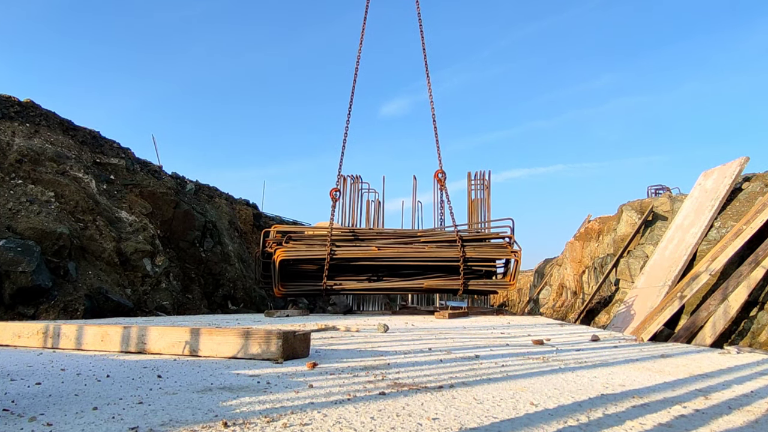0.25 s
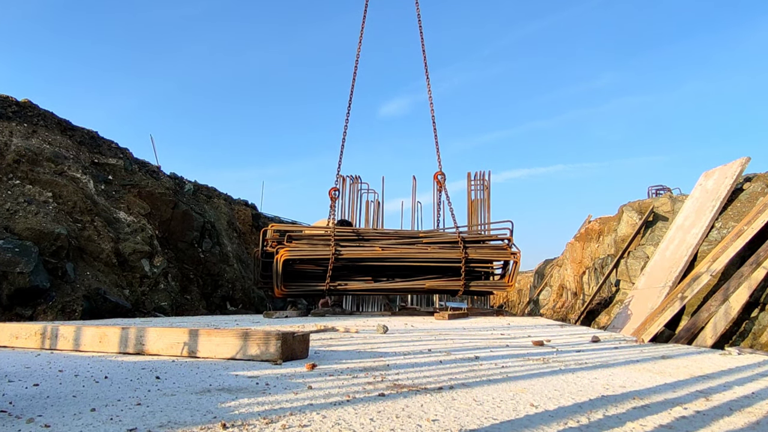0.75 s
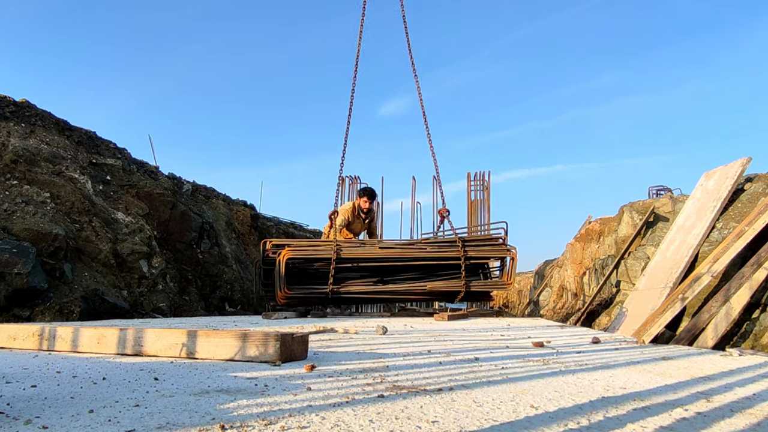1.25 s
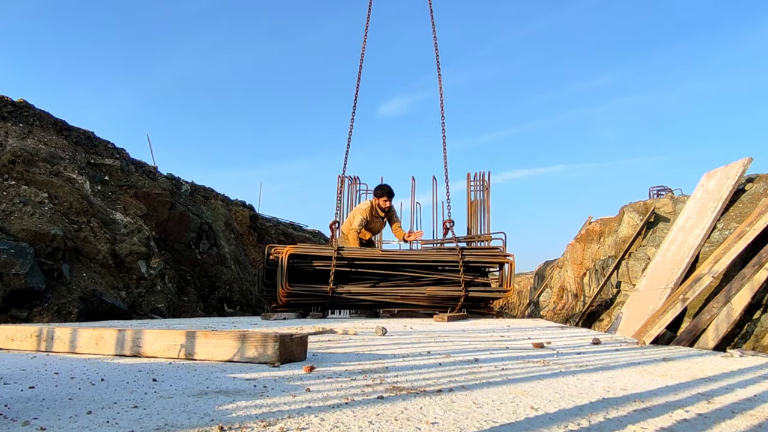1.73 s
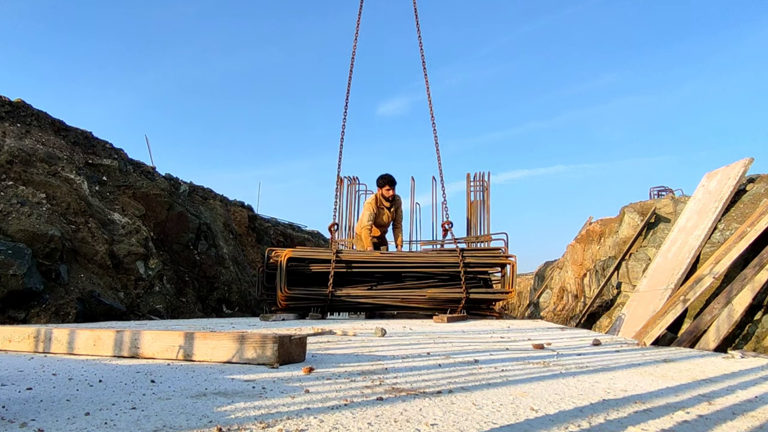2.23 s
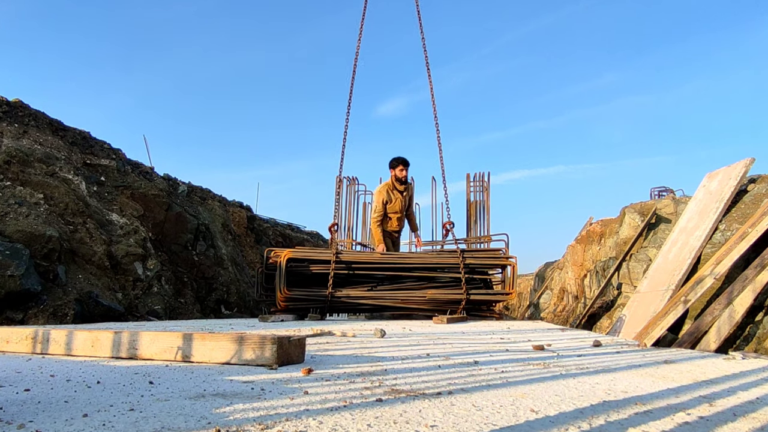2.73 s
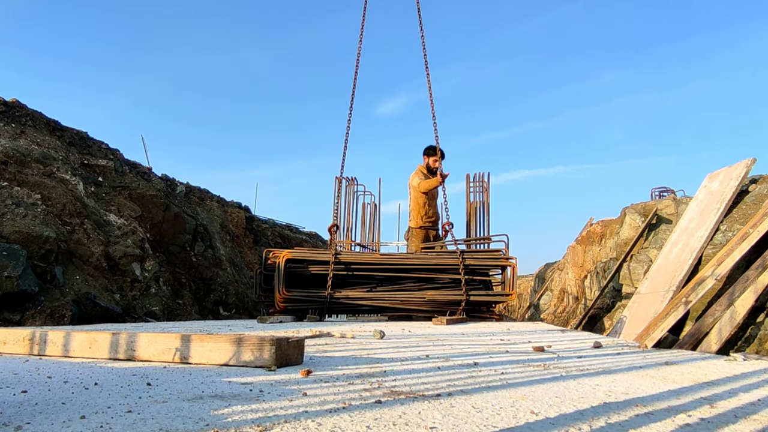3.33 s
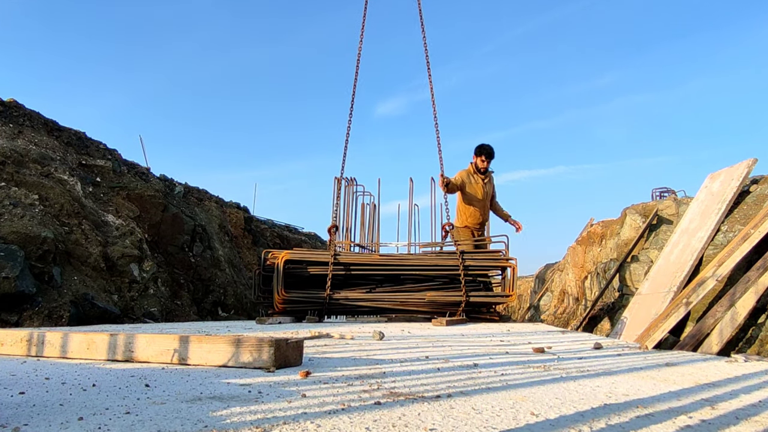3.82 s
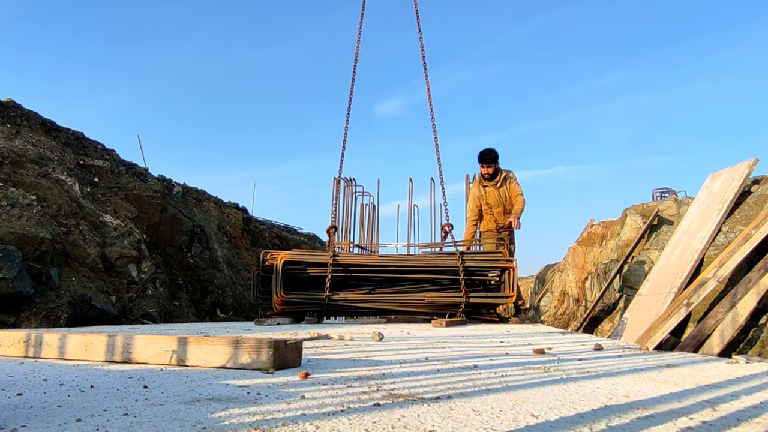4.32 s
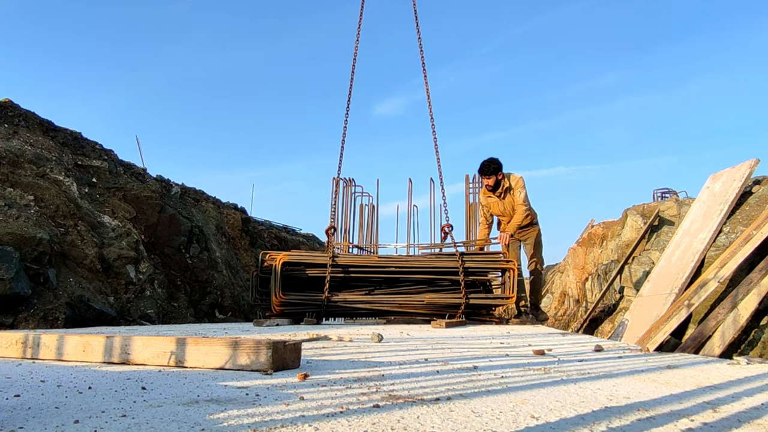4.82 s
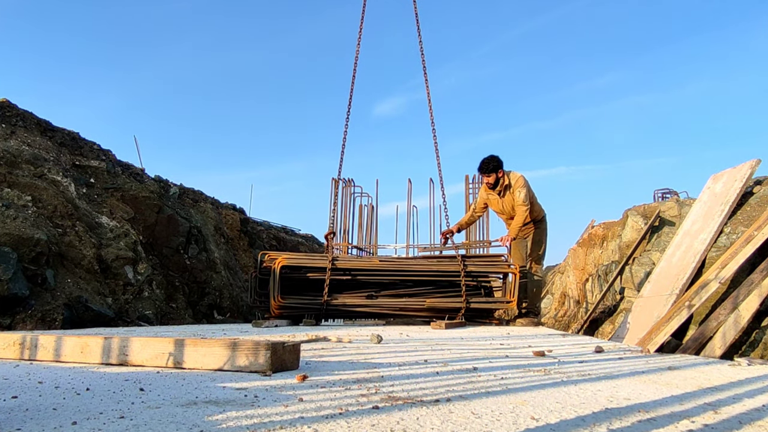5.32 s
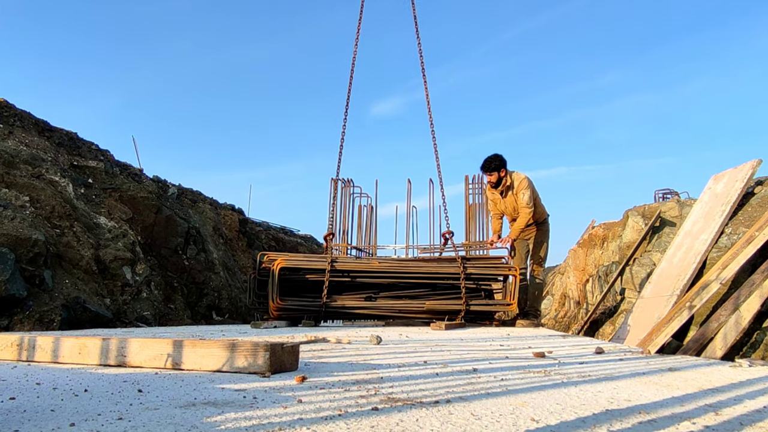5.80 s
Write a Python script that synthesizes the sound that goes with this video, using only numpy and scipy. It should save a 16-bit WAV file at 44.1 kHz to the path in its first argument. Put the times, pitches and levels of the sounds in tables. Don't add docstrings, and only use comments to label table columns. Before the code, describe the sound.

Close metallic clatter of rebar landing on a slab, sparse clinks afterwards, with idling machinery, distant hammering and a late engine rev.

```python
import sys
import numpy as np
from scipy import signal
from scipy.io import wavfile

SR = 44100
rng = np.random.default_rng(int(sys.argv[2]) if len(sys.argv) > 2 else 0)


def output_pcm(signal):
    pcm = np.clip(np.atleast_2d(signal).T, -1, 1) * 32767
    wavfile.write(sys.argv[1], SR, np.round(pcm).astype(np.int16))


def how_loud(loudness_db):
    steps = np.asarray(loudness_db, float) / 20
    return 10 ** steps


N = 266937
T = np.arange(N) / SR

# (frequency [Hz], density [dB per Hz])
SITE_SPECTRUM = [(12, -37), (20, -9), (47, -2), (87, -14.5), (160, -14), (224, -17.5), (400, -22),
                 (896, -23.5), (1200, -26.5), (2180, -36.5), (3130, -42), (5000, -69.5), (8500, -60),
                 (14000, -59.5)]
# (frequency [Hz], shared power [0-1])
SIDE_LIKENESS = [(60, 1), (300, 1), (1000, 0.83), (2500, 0.42), (4000, 0.12), (14000, 0.05)]
# (time [s], opening [0-1])
THROTTLE = [
    (4.7, 0),
    (5.15, 1),
    (5.55, 1),
    (5.8, 0.14),
]
# (firing rate [Hz], [(multiple [-], rms level [dB])])
STEADY_MACHINES = [
    (38.7, [(1, -55.5), (2, -40), (3, -54.5), (4, -44.5), (5, -46.5)]),
    (41.2, [(1, -55), (2, -45.5), (3, -46), (4, -50.5)]),
    (47.7, [(1, -38)]),
]
# (time
# [s], # firing rate [Hz], load [dB])
CRANE_REVS = [(0, 50.66, -32.5), (.7, 44, -44), (.95, 44.4, -31), (1.7, 53.53, -62), (2.4, 47, -37),
              (2.65, 52.1, -43), (4.5, 51.2, -41), (4.9, 40.49, -38), (5.13, 44.16, -38),
              (5.41, 51.15, -31.5), (5.54, 50.9, -36), (5.68, 51.7, -76), (6.05, 47.9, -40)]
# (time [s], level [dB])
JINGLE = [(0.0, -57.5), (0.17, -65), (1.09, -62.5), (1.25, -44), (2.08, -31), (2.19, -63), (2.75, -52),
          (3.3, -66.5), (4.6, -65.5), (5.34, -62), (5.55, -40), (5.86, -61), (6.05, -58)]
# (time [s], level [dB])
SLIDING = [
    (1.07, -64.5),
    (1.112, -16.5),
    (1.2, -25.5),
    (1.31, -21),
    (1.6, -18.5),
    (1.765, -21.5),
    (1.79, -30),
    (1.875, -24.5),
    (1.99, -40.5),
]
# (frequency [Hz], density [dB per Hz])
BAR_SPECTRUM = [(120, -33), (200, 9), (272, -25), (405, -0.5), (593, -11.5), (724, -3.5), (1250, -12.5),
                (2000, -3.5), (7230, -3), (9490, -7.5), (13400, -5), (14400, -29), (15200, -57.5)]
# (time [s], peak [dB], favoured pitch [Hz], clatter t60 [s])
SWINGING = [(0.0568, -38.5, 7840, 0.046), (0.1171, -39, 8250, 0.061), (0.4269, -40, 2980, 0.12),
            (0.9487, -37, 3400, 0.07)]
# (time [s], peak [dB], favoured pitch [Hz], clatter t60 [s])
LANDING = [(1.0872, -27.5, 3320, 0.23), (1.1047, -8.5, 6500, 0.17), (1.1119, -7, 7450, 0.11),
           (1.2148, -31.5, 5300, 0.066), (1.247, -13, 5310, 0.23), (1.295, -5.5, 7700, 0.23),
           (1.3853, -7.5, 6610, 0.34), (1.476, -32.5, 5790, 0.14), (1.495, -9.5, 7490, 0.23),
           (1.5254, -4, 7150, 0.38), (1.6209, -3.5, 6950, 0.23), (1.6736, -2, 7420, 0.11)]
# (time [s], peak [dB], favoured pitch [Hz], clatter t60 [s])
BOUNCING = [(1.836, -18.5, 4900, 0.12), (1.8845, -4.5, 8000, 0.12), (2.0001, -6.5, 6650, 0.19),
            (2.065, -18, 6400, 0.5)]
# (time [s], peak [dB], favoured pitch [Hz], clatter t60 [s])
SETTLING = [(2.168, -29, 4840, 0.18), (2.185, -37, 8700, 0.18), (2.2147, -25.5, 3050, 0.16),
            (2.286, -28, 7200, 0.17), (2.308, -23.5, 6100, 0.081), (2.3291, -21.5, 8400, 0.23),
            (2.4917, -46, 3270, 0.14), (2.5127, -32, 5890, 0.21), (2.5343, -32.5, 5770, 0.38),
            (2.579, -33, 8650, 0.25), (2.6035, -29, 3460, 0.25), (2.7147, -52.5, 3620, 0.11),
            (2.8295, -24.5, 5600, 0.17), (2.8794, -26, 3700, 0.23), (2.9612, -48, 5710, 0.067),
            (3.0505, -46, 3240, 0.11), (3.0744, -38, 3910, 0.14), (3.0909, -38, 4930, 0.21),
            (3.1445, -35, 8620, 0.28), (3.2141, -32, 6800, 0.3), (3.25, -30, 5600, 0.2),
            (3.3243, -33, 8600, 0.34)]
# (time [s], peak [dB], favoured pitch [Hz], clatter t60 [s])
UNHOOKING = [(3.4181, -42, 3250, 0.29), (3.459, -41, 7070, 0.27), (3.5354, -44.5, 3250, 0.17),
             (3.5818, -29.5, 6400, 0.28), (3.6098, -27.5, 6200, 0.11), (3.7783, -44, 5180, 0.2),
             (3.899, -45, 5670, 0.1), (3.9923, -37, 6740, 0.19), (4.0133, -35.5, 5710, 0.33),
             (4.0463, -32, 7560, 0.12), (4.1814, -37, 4290, 0.14), (4.5855, -47.5, 3440, 0.18),
             (4.6997, -57, 3300, 0.14), (4.8412, -34.5, 5140, 0.17)]
# (time [s], peak [dB], favoured pitch [Hz], clatter t60 [s])
HANDLING = [(5.3046, -53, 3180, 0.16), (5.3921, -40, 3210, 0.19), (5.425, -24, 2700, 0.083),
            (5.4715, -23.5, 7100, 0.49), (5.5144, -16.5, 6800, 0.17), (5.5638, -19, 4750, 0.11),
            (5.6445, -22.5, 6800, 0.2), (5.739, -32, 6950, 0.11), (5.8187, -24, 3550, 0.43),
            (6.016, -31, 7060, 0.19)]
# (time [s], peak [dB], favoured pitch [Hz], clatter t60 [s])
FURTHER_CONTACTS = [(0.4494, -39.5, 4570, 0.3), (0.489, -44, 3530, 0.33), (1.145, -6, 6210, 0.088),
                    (1.3394, -21, 6500, 0.13), (1.4204, -19, 5610, 0.09), (1.559, -14, 6800, 0.086),
                    (1.6396, -7, 7000, 0.051), (2.3594, -37, 8050, 0.24), (2.8994, -42, 3870, 0.1),
                    (3.1344, -36, 8520, 0.12), (3.3794, -34, 5670, 0.09), (3.6294, -35.5, 3130, 0.13),
                    (5.2694, -45, 6930, 0.29), (5.5252, -14.5, 7400, 0.073), (5.6, -27, 3200, 0.25),
                    (5.6694, -39, 7310, 0.072), (5.8504, -27.5, 7560, 0.097), (5.879, -25, 3870, 0.068)]
# (events, middle re peak [dB], top re peak [dB])
CONTACT_KINDS = [(SWINGING, 0.5, -15), (LANDING, -25.5, -16.5), (BOUNCING, -15.5, -14.5), (SETTLING, -14.5, -17),
                 (UNHOOKING, -12, -31), (HANDLING, -8.5, -38), (FURTHER_CONTACTS, -20.5, -14.5)]
# (time [s], peak [dB])
THUDS = [(1.117, -21), (1.15, -25), (1.336, -28), (1.395, -23), (1.428, -31.5), (1.619, -29.5),
         (1.678, -21), (1.883, -38)]
# (time [s], peak [dB], lower mode re peak [dB], left re right [dB])
CHAIN_CLINKS = [(0.116, -44.5, -20, 7), (2.1855, -29, -10, 6), (2.575, -41, -10, 9),
                (2.8285, -39.5, 5, 15.5), (2.8524, -43, -6, 12.5), (2.9594, -63, 18, 2),
                (3.091, -50, -10, 12), (3.1433, -49, -15, 19), (3.1554, -47, -6, 21), (3.252, -45, 1, 4),
                (3.325, -41.5, -2.5, 13), (3.4994, -59, -8, 12.5), (3.6105, -41.5, -8, 15),
                (4.841, -66, 19, 4)]
# (frequency [Hz], level [dB], t60 [s])
LINK_MODES = [
    (8620, 3.5, 0.055),
    (5610, 1, 0.073),
    (7330, -1.5, 0.038),
    (12800, -16, .06),
]
# (time [s], peak [dB], lower mode [dB], upper mode [Hz])
HAMMER_KNOCKS = [(0.9492, -32.5, -9, 2000), (2.4239, -43, 3, 1670), (3.023, -36.5, -2.5, 1560),
                 (3.631, -34, -2, 1480), (4.239, -33, -10, 1480), (4.8516, -33.5, -9, 1490)]
# (time [s], pressure [full scale], decay [s], swing [Hz])
DIAPHRAGM_JOLTS = [
    (1.084, -.07, .006, 3),
    (1.673, -.13, .03, 3),
    (1.686, -.3, .055, 5.5),
    (1.787, .27, .25, .9),
    (1.884, -.08, .1, .5),
]
# (time [s], level [dB])
GAIN_DUCK = [
    (1.69, 0.5),
    (1.72, -7),
    (1.76, -7.5),
    (1.8, 0.5),
    (1.9, 1),
]


def rms_one(x):
    return x / np.sqrt(np.mean(x ** 2) + 1e-20)


def in_time(rows):
    s, *columns = np.transpose(rows)
    return [np.interp(T, s, c) for c in columns]


def at_hz(points, hz):
    table_hz, values = np.array(points).T
    return np.interp(np.log(hz), np.log(table_hz), values)


def drift(rate_hz):
    r = np.exp(-80 * np.pi * rate_hz / SR)
    slow = signal.lfilter([1], [1, -2 * r, r * r], rng.standard_normal(N // 40 + 2002))[2000:]
    return np.interp(np.arange(N) / 40, np.arange(len(slow)), rms_one(slow))


def band_noise(x, low_hz, high_hz):
    return signal.sosfilt(signal.butter(2, [low_hz, high_hz], "band", fs=SR, output="sos"), x)


def dying(s, t60, rise_s):
    start = round(s * SR)
    t = np.arange(min(int(t60 * 1.2 * SR), N - start)) / SR
    return start, t, (1 - np.exp(-t / rise_s)) * how_loud(-60 * t / t60)


def puff(s, level_db, t60, low_hz, high_hz):
    out = np.zeros(N)
    i, t, shape = dying(s, t60, rise_s=0.0005)
    noise = band_noise(rng.standard_normal(len(t)), low_hz, high_hz)
    out[i:i + len(t)] = how_loud(level_db) * shape * rms_one(noise)
    return out


def roar(patchy_db):
    shared, own = 0, 0
    edges = 20 * 2 ** np.arange(0, 9.7, .45)
    white, together = rng.standard_normal((2, 3, N)), drift(0.83)
    for k, (low, high) in enumerate(zip(edges, edges[1:])):
        band = band_noise(white[k % 2], low, high)
        hz = np.sqrt(low * high)
        alike = np.clip(at_hz(SIDE_LIKENESS, hz), 0, 1)
        flicker_db = patchy_db * (.5 * together + drift(23))
        gain = how_loud(at_hz(SITE_SPECTRUM, hz) - 1.63 * (hz < 220) + flicker_db)
        shared = shared + gain * np.sqrt(alike) * band[0]
        own = own + gain * np.sqrt(1 - alike) * band[1:]
    middle = band_noise(shared + own[0], 250, 900)
    level_db = -44 + 3.0 * in_time(THROTTLE)[0]
    level = how_loud(level_db) / np.std(middle)
    return level * shared, level * own


def steady_machines():
    out = 0
    for hz, orders in STEADY_MACHINES:
        turn = 2 * np.pi * np.cumsum(hz * (1 + 0.00291 * drift(0.84))) / SR
        for multiple, level_db in orders:
            level = how_loud(level_db + 0.5 + 1.5 * drift(9.4))
            out = out + level * np.sin(multiple * turn + rng.uniform(0, 6.46))
    return out


def crane_engine():
    hz, load_db = in_time(CRANE_REVS)
    upper_db = -14.5 + 12 * in_time(THROTTLE)[0]
    turn = 2 * np.pi * np.cumsum(hz) / SR
    upper = np.cos(2 * turn) + how_loud(5.0) * np.cos(3 * turn) + how_loud(-17.5) * np.cos(4 * turn)
    rasp = band_noise(rng.standard_normal(N), 300, 1100)
    upper += how_loud(4.0) * rasp * (1 + np.cos(turn))
    return how_loud(load_db - 1.5) * (np.cos(turn) + how_loud(upper_db) * upper)


def grains(per_s, spread_db, shared):
    sizes = how_loud(spread_db * np.minimum(rng.exponential(1, (3, N)), 5)) * rng.choice([-1, 1], (3, N))
    both, *own = sizes * (rng.random((3, N)) < per_s / SR)
    return rms_one(np.sqrt(shared) * both + np.sqrt(1 - shared) * np.array(own))


def bar(low_hz, high_hz, cycles, favoured_hz=1, favour_db=0, count=36):
    t = np.arange(SR // 22, dtype=np.float32) / SR
    draw = rng.random((4, count, 1), dtype=np.float32)
    hz = low_hz * (high_hz / low_hz) ** ((np.arange(count)[:, None] + draw[0]) / count)
    favour = favour_db * np.exp(-(np.log(hz / favoured_hz) / 0.19) ** 2)
    gain = how_loud(at_hz(BAR_SPECTRUM, hz) + favour) * hz
    hz = hz.astype(np.float32)
    mode_cycles = cycles * how_loud(11.0 * (draw[1] - .5))
    fade = np.exp(-t * (np.log(1000) * hz / mode_cycles).astype(np.float32))
    side_shift = [[[0]], [[.6]]] * draw[3] * np.minimum(hz / 2500, 1)
    phase = 2 * np.pi * (draw[2] + side_shift)
    body = np.sum(gain * fade * np.sin(2 * np.pi * hz * t + phase.astype(np.float32)), axis=1)
    return body / np.sqrt(np.sum(body ** 2) / 2)


def shake(push, low_hz, high_hz, cycles, swap_db, count, favoured_hz=1, favour_db=0):
    out, dealt = 0, rng.integers(0, count, N)
    shares = how_loud(swap_db * np.array([drift(16.0) for k in range(count)]))
    shares /= np.sqrt(np.mean(shares ** 2, axis=0))
    for k in range(count):
        ring = bar(low_hz, high_hz, cycles, favoured_hz, favour_db)
        out = out + signal.oaconvolve(push * (dealt == k) * shares[k], ring, axes=1)[:, :N]
    return out


def blows(contacts, mid, top):
    out, snap = np.zeros((2, N)), np.zeros(N)
    lead = round(.001 * SR)
    events = [(*row, *colour) for rows, *colour in CONTACT_KINDS for row in rows]
    for s, peak_db, hz, t60, mid_db, top_db in events:
        octaves = np.log2(hz / 5500)
        i, t, shape = dying(s - .001, np.clip(t60, .02, .5), rise_s=0.0015)
        shape = how_loud(peak_db - 9.5) * shape * (1 + 0.53 * np.exp(-t / 0.0033))
        push = shape * contacts[:, i:i + len(t)]
        push[:, lead] += 10 * shape.max()
        contacts[:, i + lead] += 4
        rung = signal.oaconvolve(push, bar(2058, 9333, 140, hz, favour_db=5.5), axes=1)
        out[:, i:i + rung.shape[1]] += rung[:, :N - i]
        snap[i:i + len(t)] += shape.max() * how_loud(7.0 + 0.37 * top_db) * np.exp(-t / 0.0016)
        mid[i:i + len(t)] += how_loud(mid_db - 2 * octaves) * shape
        top[i:i + len(t)] += how_loud(top_db + 7 * octaves) * shape
    return out + band_noise(snap * rng.standard_normal((2, N)), 4000, 16000)


def thuds(contacts, slide):
    set_down_s = 1.7
    low = slide * how_loud(np.where(T < set_down_s, -16, -37) - 4.0)
    for s, peak_db in THUDS:
        i, t, shape = dying(s - .002, t60=0.21, rise_s=0.0051)
        low[i:i + len(t)] += how_loud(peak_db - 5.5) * shape
    both_sides = contacts + 0.75 * contacts[::-1]
    return shake(both_sides * low * 0.63, 220, 874, cycles=18, swap_db=6, count=2, favoured_hz=330, favour_db=11.0)


def slab():
    slam = puff(1.6845, -16, 0.013, 180, 1200) * [[1], [.6]]
    whip = np.stack([puff(1.8848, -10.5, .012, 4500, 15000) for side in range(2)])
    return slam + whip


def bundle():
    on = (T > SLIDING[0][0]) & (T < SLIDING[-1][0])
    slide = on * how_loud(in_time(SLIDING)[0] - 1.0)
    jingle = how_loud(np.minimum(in_time(JINGLE)[0], -44))
    bright, mid = np.hypot(slide, jingle), slide * how_loud(-11.5)
    top = np.hypot(slide * how_loud(-22.5), jingle * how_loud(-32.5))
    contacts = grains(per_s=2500, spread_db=3.0, shared=0.34)
    out = blows(contacts, mid, top)
    out += shake(contacts * bright, 2500, 9300, cycles=210, swap_db=11.5, count=5)
    out += shake(contacts * top, 9300, 14500, cycles=190, swap_db=21.5, count=2)
    out += shake(contacts * mid, 900, 2500, cycles=17.7, swap_db=6.0, count=4)
    out += thuds(contacts, slide) + slab()
    return out * how_loud([[.3], [-.3]])


def chain():
    out = np.zeros((2, N))
    for s, peak_db, lower_db, pan_db in CHAIN_CLINKS:
        pan = np.array([[pan_db / 2], [-pan_db / 2]])
        for k, (hz, level_db, t60) in enumerate(LINK_MODES):
            i, t, shape = dying(s, t60, rise_s=0.0003)
            level = how_loud(peak_db + level_db + lower_db * (k == 1) + pan)
            out[:, i:i + len(t)] += level * shape * np.sin(2 * np.pi * (hz * t + rng.random((2, 1))))
    return out


def hammer():
    out = np.zeros(N)
    for s, peak_db, low_db, hz in HAMMER_KNOCKS:
        i, t, shape = dying(s - .001, t60=0.02, rise_s=0.0017)
        both = np.sin(2 * np.pi * hz * t) + how_loud(low_db) * np.sin(2 * np.pi * 1050 * t)
        out[i:i + len(t)] += how_loud(peak_db + 7.5) * shape * both
        out += puff(s - .001, peak_db - 4.5, 0.017, 0.38 * hz, 1.3 * hz)
    out += how_loud(-4) * np.roll(out, round(0.0042 * SR))
    return out * how_loud([[1.2], [-1.2]])


def jolt():
    out = np.zeros(N)
    for s, size, decay_s, hz in DIAPHRAGM_JOLTS:
        t = np.maximum(T - s, 0)
        out += (1 - np.exp(-t / 0.0019)) * size * np.exp(-t / decay_s) * np.cos(2 * np.pi * hz * t)
    return out


def scene():
    shared, own = roar(patchy_db=1.5)
    machines = shared + steady_machines() + crane_engine()
    left_lead = 19
    machines = np.stack([machines, np.roll(machines, left_lead)]) + own
    return machines * how_loud([[.35], [-.35]]) + bundle() + chain() + hammer()


def top_cut(x):
    return signal.sosfilt(signal.butter(12, 15360, fs=SR, output="sos"), x)


def record(dry):
    offset = jolt() * [[1], [.38]]
    ducked = dry * how_loud(in_time(GAIN_DUCK)[0])
    mix = 1.1 * np.tanh((ducked + offset) / 1.1)
    mix = signal.sosfilt(signal.cheby2(10, 50, 15400, fs=SR, output="sos"), mix)
    return top_cut(mix)


dry = scene()
out = record(dry)
output_pcm(out)
```